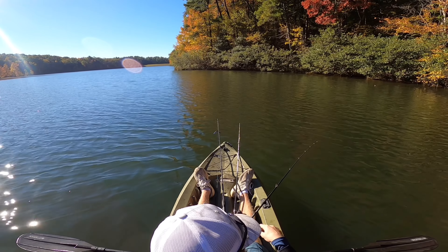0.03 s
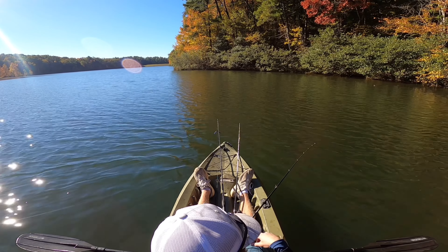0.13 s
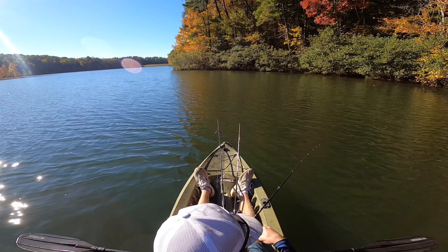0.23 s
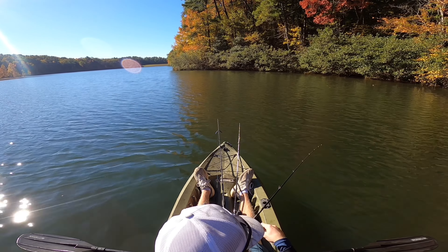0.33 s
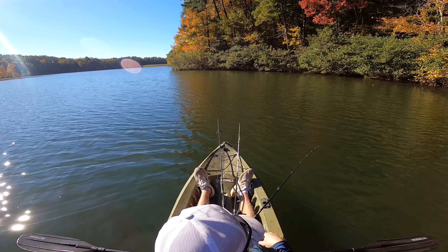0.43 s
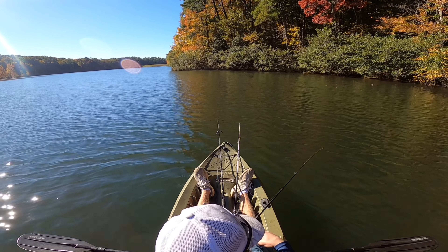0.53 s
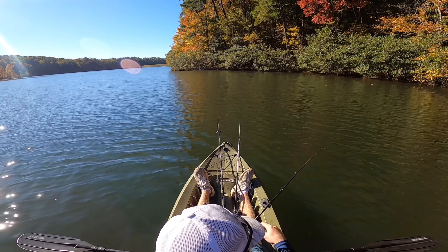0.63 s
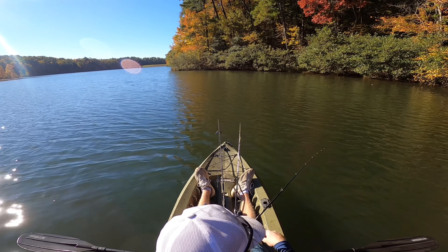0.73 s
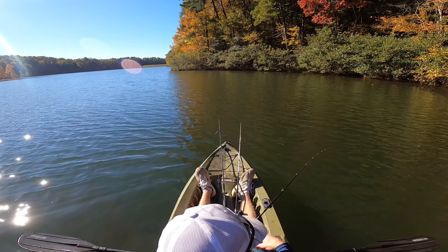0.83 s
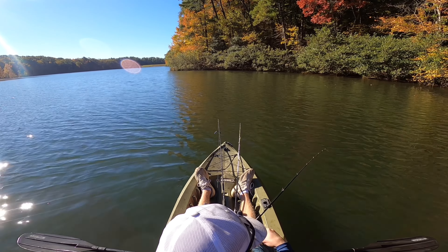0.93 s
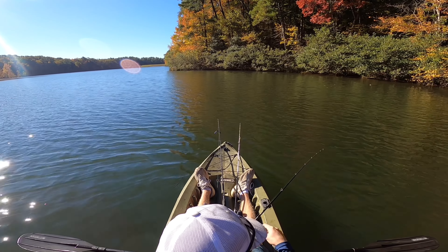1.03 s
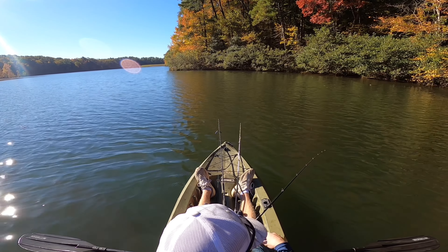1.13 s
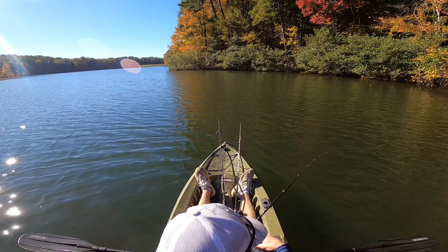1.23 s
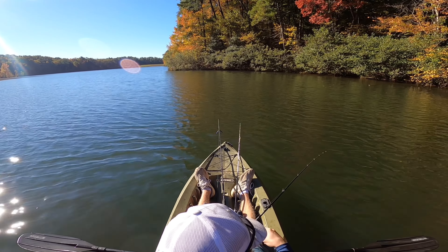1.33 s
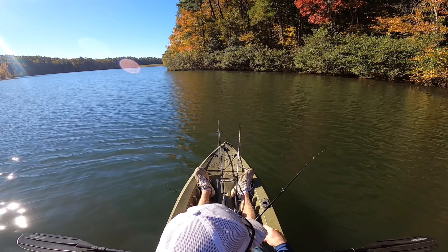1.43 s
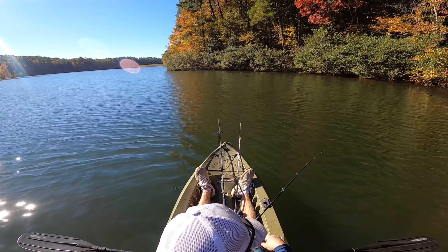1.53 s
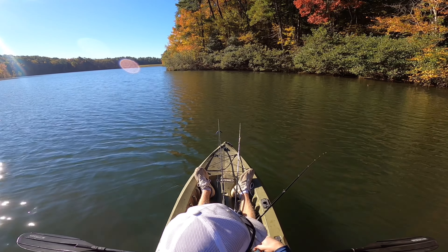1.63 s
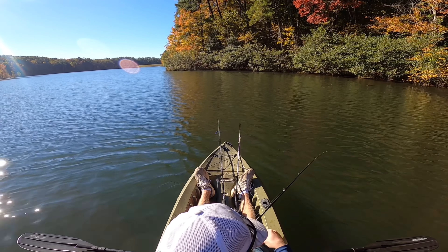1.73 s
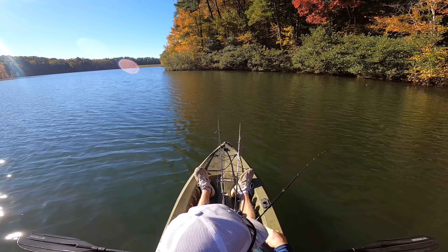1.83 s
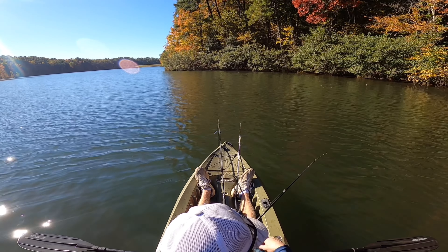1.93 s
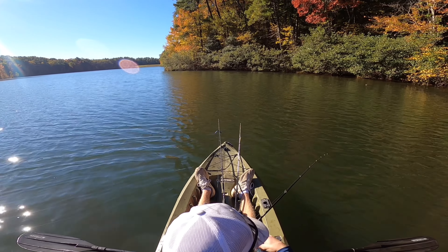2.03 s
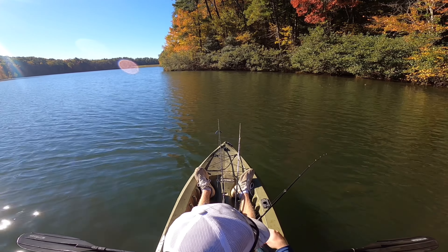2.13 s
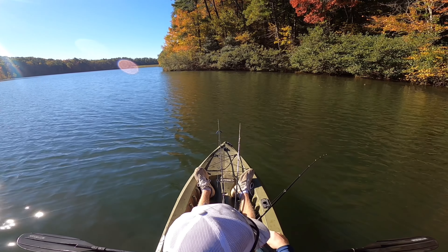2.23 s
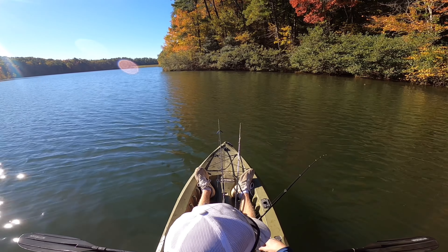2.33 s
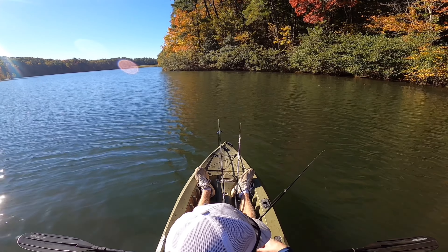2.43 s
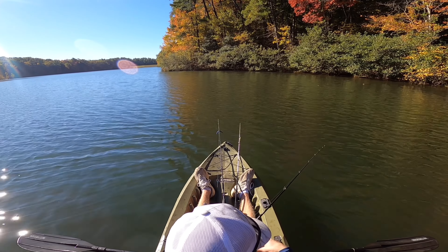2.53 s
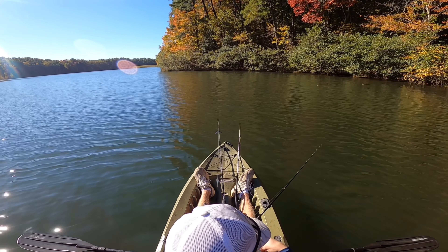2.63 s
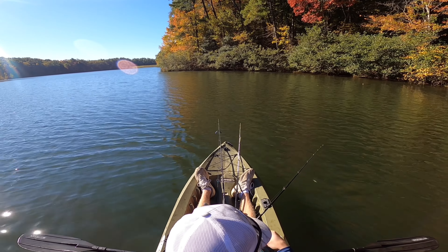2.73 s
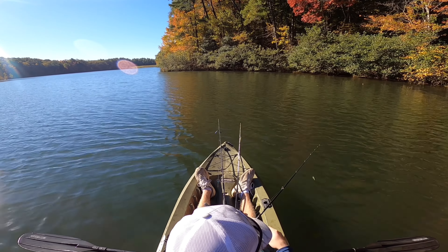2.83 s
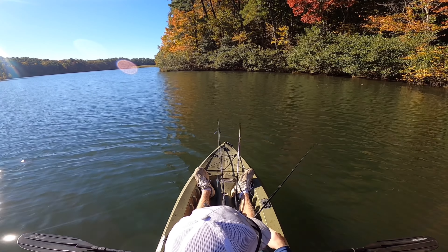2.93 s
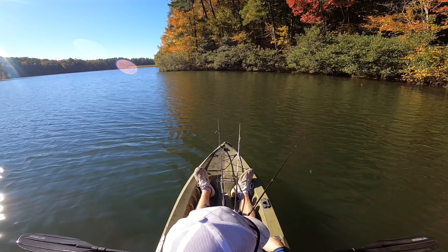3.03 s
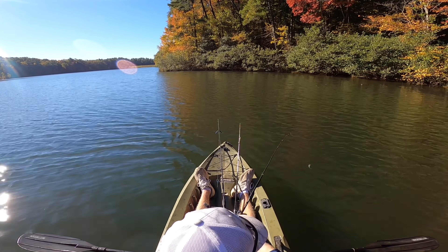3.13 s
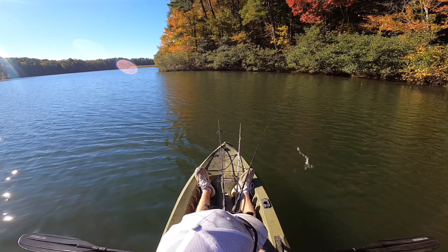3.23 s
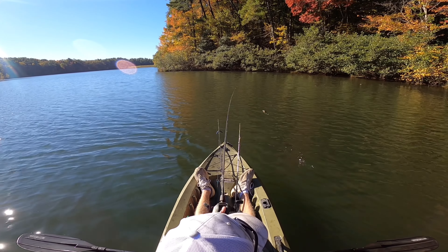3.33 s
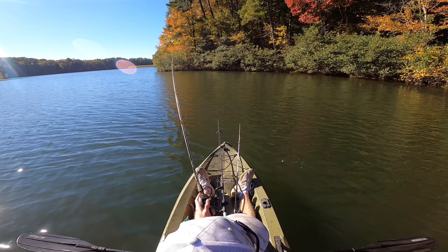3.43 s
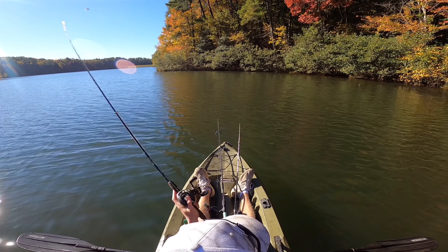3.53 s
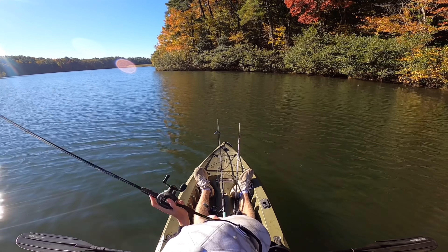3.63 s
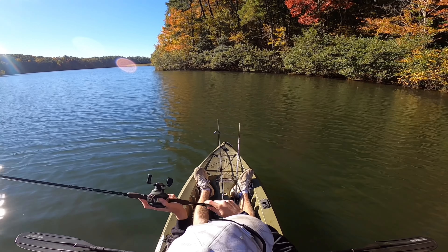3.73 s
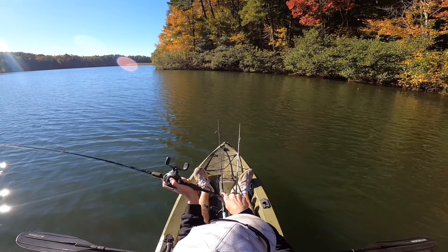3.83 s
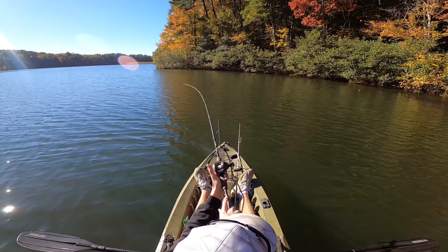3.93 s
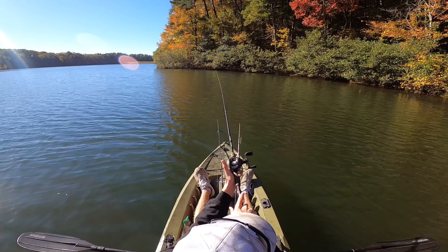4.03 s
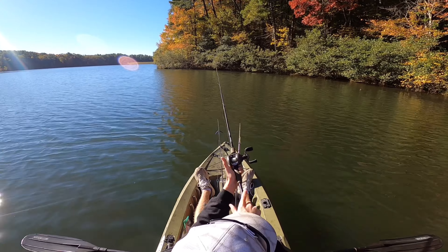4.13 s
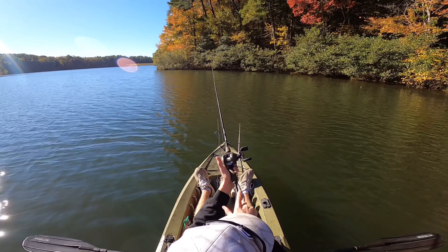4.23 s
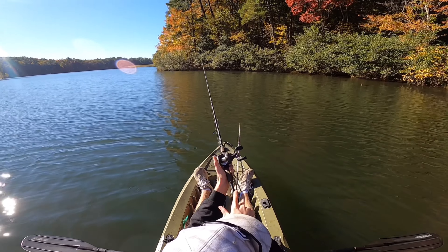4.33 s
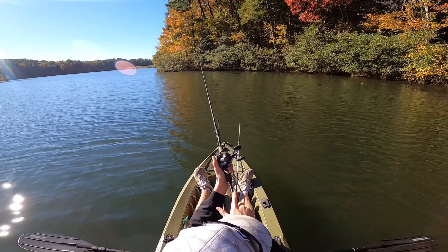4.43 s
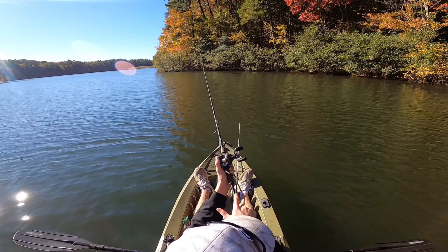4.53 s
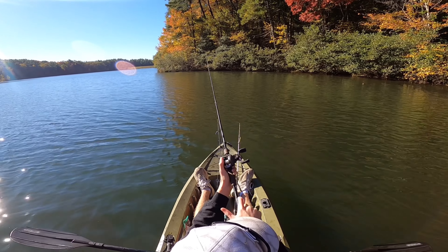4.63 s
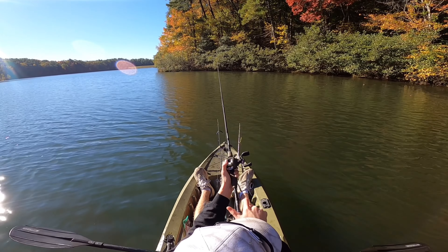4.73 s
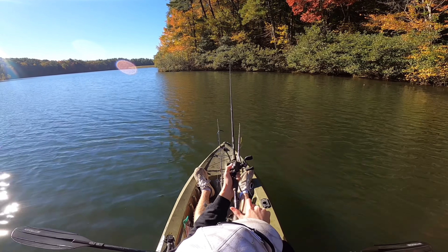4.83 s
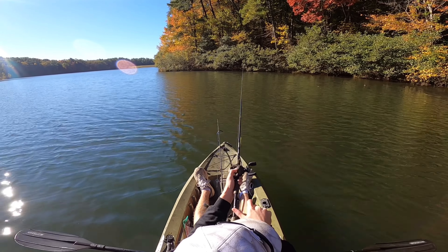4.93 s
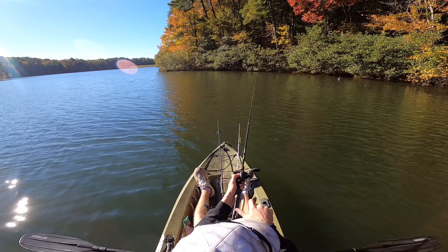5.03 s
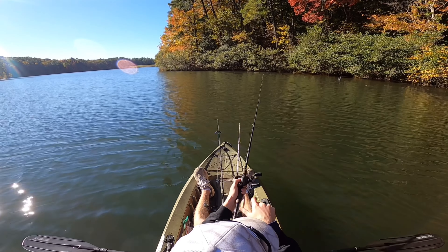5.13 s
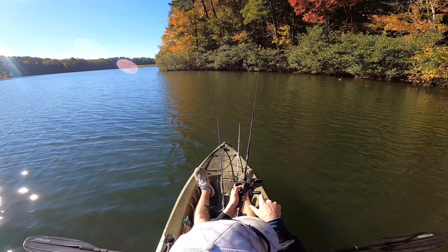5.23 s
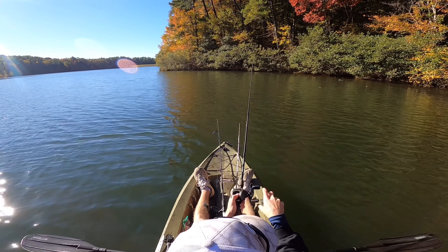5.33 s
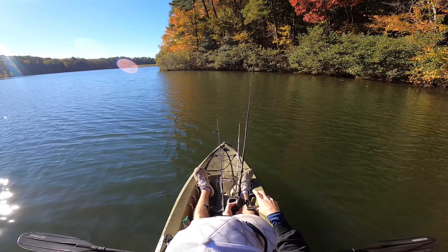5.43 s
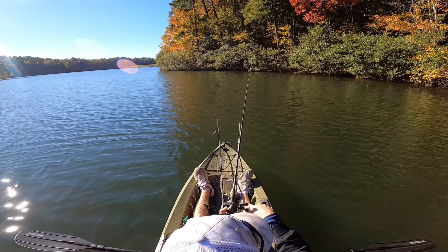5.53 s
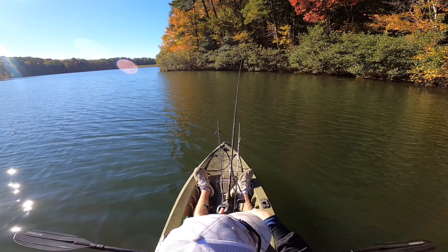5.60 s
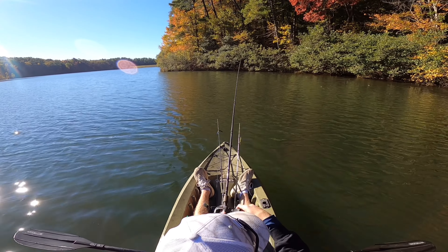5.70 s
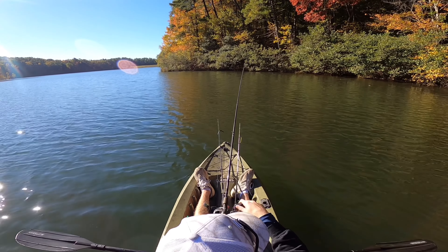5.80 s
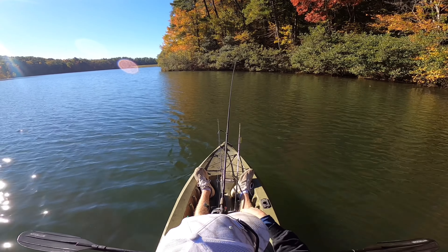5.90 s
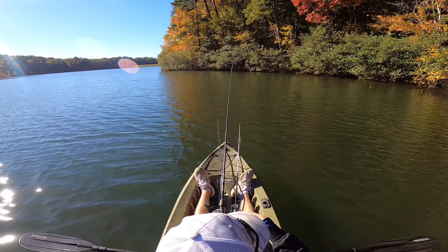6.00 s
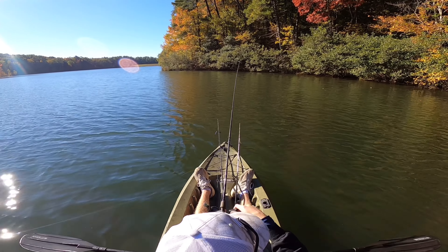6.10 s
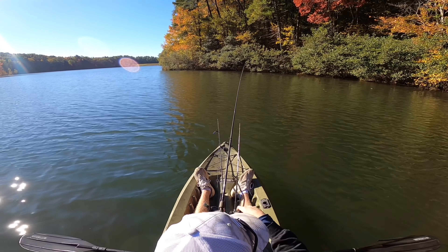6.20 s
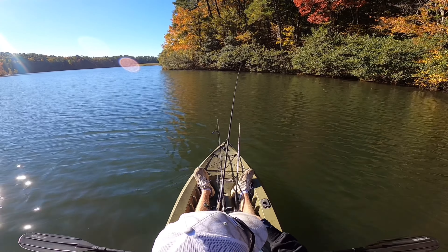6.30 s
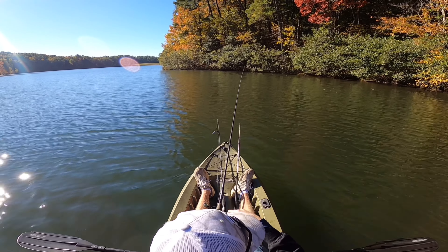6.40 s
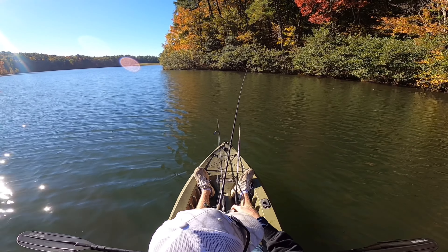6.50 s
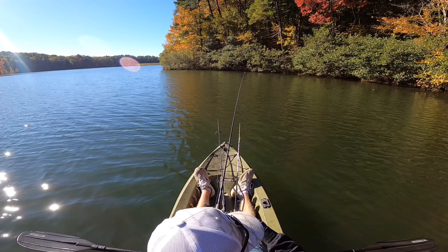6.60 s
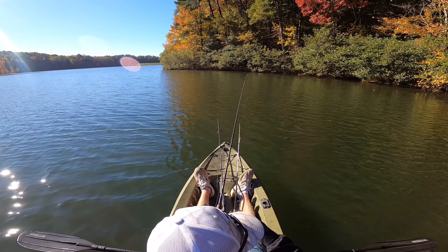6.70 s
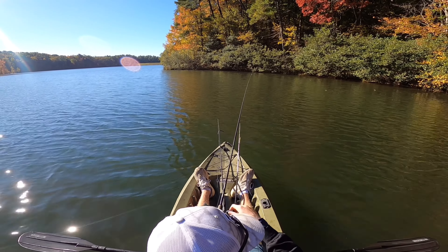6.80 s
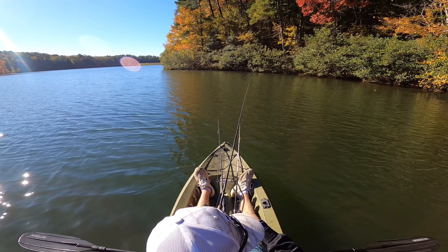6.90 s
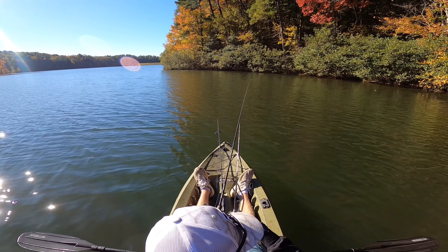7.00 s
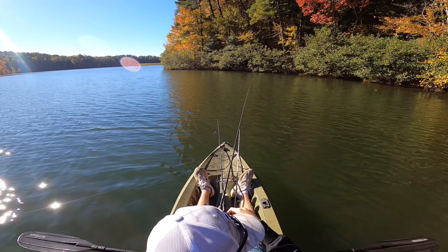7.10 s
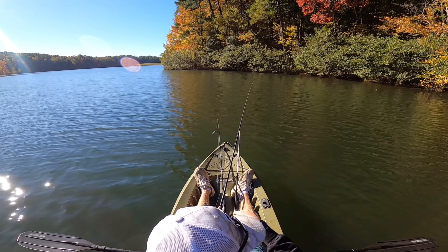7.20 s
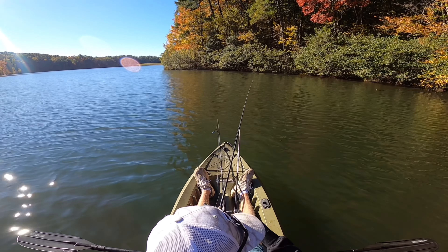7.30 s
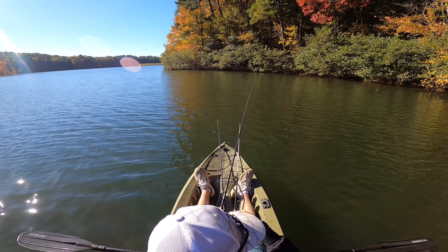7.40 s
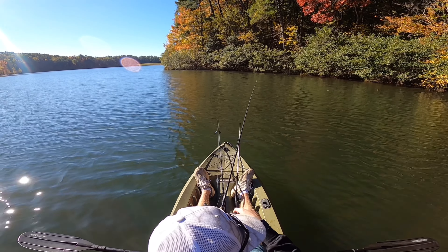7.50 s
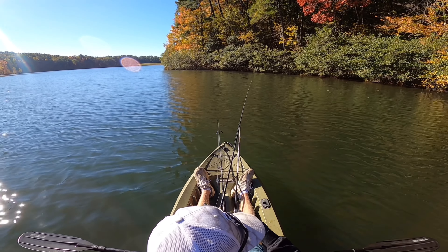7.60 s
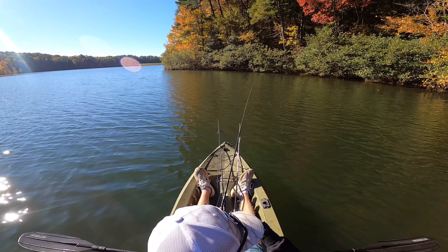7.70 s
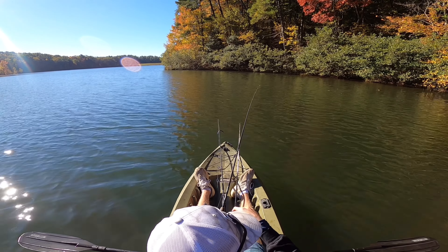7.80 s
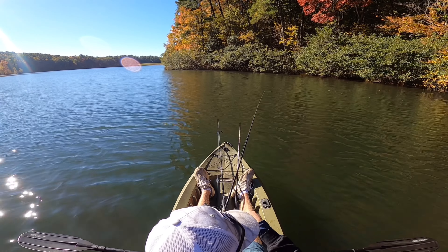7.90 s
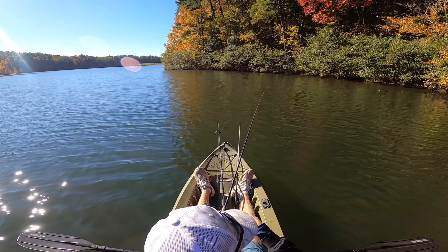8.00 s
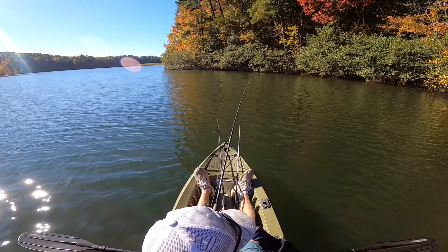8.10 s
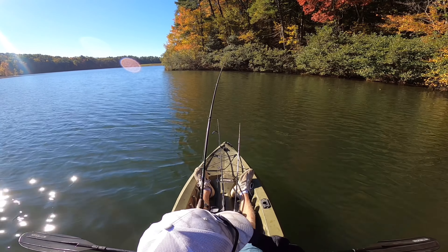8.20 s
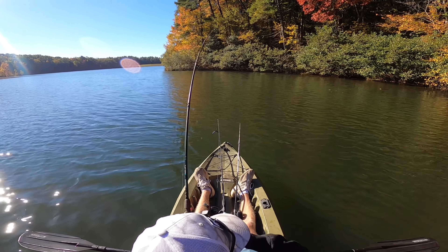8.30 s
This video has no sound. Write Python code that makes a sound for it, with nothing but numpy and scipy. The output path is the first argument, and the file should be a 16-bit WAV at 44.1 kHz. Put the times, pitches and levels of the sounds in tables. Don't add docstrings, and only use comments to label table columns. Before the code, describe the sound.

Close fishing reel gears buzz, a hard clack, then a swish and rattling whirr of a spinning spool, another clack, more winding on a quiet lake.

```python
import sys
import numpy as np
from scipy import signal
from scipy.fft import rfft, irfft, next_fast_len
from scipy.io import wavfile

SR = 44100
rng = np.random.default_rng(int(sys.argv[2]) if len(sys.argv) > 2 else 0)


def bounce(signal):
    frames = np.transpose(np.atleast_2d(signal))
    limited = np.clip(frames, -1, 1)
    pcm = np.round(limited * 32767).astype(np.int16)
    wavfile.write(sys.argv[1], SR, pcm)


def undo_db(level):
    steps = np.asarray(level, float) / 20
    return 10 ** steps


N = 368235
HIT = 4000
HIT_S = np.arange(HIT) / SR


def time():
    return np.arange(N) / SR


def rms_one(x):
    return x / np.sqrt(np.mean(x ** 2) + 1e-20)


def span(rows, start=0.):
    s, *columns = np.transpose(rows)
    part = slice(round((s[0] + start) * SR), min(round((s[-1] + start) * SR), N))
    t = np.arange(part.start, part.stop) / SR - start
    return part, [np.interp(t, s, column) for column in columns]


def at_hz(points, hz):
    point_hz, point_db = np.transpose(points)
    return np.interp(np.log(hz), np.log(point_hz), point_db)


def drift(rate, count):
    r = np.exp(-80 * np.pi * rate / SR)
    slow = signal.lfilter([1], [1, -2 * r, r * r], rng.standard_normal(count // 40 + 1002))[1000:]
    return np.interp(np.arange(count) / 40, np.arange(len(slow)), rms_one(slow))


def resonate(x, hz, width):
    r = np.exp(-np.pi * width / SR)
    return signal.lfilter([(1 - r * r) / 2, 0, (r * r - 1) / 2], [1, -2 * r * np.cos(2 * np.pi * hz / SR), r * r], x)


def body(x, modes):
    return sum((-1) ** k * undo_db(db) * resonate(x, hz, width) for k, (hz, width, db) in enumerate(modes))


def butter(x, order, hz, kind):
    return signal.sosfilt(signal.butter(order, hz, kind, fs=SR, output="sos"), x)


def pair(count, alike):
    mid, side = rng.standard_normal((2, count))
    share = np.clip(alike, 0, 1)
    return np.sqrt((1 + share) / 2) * mid + np.sqrt((1 - share) / 2) * side * [[1], [-1]]


def coloured(spectrum, alike, patchy_db, rate):
    low, high = spectrum[0][0], spectrum[-1][0]
    edges = low * 2 ** np.arange(0, np.log2(high / low) + 1 / 3, 1 / 3)
    white, out = [pair(N, alike), pair(N, alike)], 0
    for k, (a, b) in enumerate(zip(edges, edges[1:])):
        band = butter(white[k % 2], 2, [a, b], "band")
        out = out + undo_db(at_hz(spectrum, np.sqrt(a * b)) + patchy_db * drift(rate, N)) * band
    return rms_one(out)


def glide(rows, start, rough):
    part, (hz, db) = span(rows, start)
    return part, undo_db(db + rough * drift(150, len(hz))) * np.sin(2 * np.pi * np.cumsum(hz) / SR)


def add_hit(out, s, db, sound):
    out[:, round(s * SR):][:, :HIT] += undo_db(db) * sound / np.abs(sound).max()


def lake():
    # (time [s], level [dB])
    gusts = [(0.0, -66.5), (0.65, -64), (0.74, -67), (3.86, -66.5), (4.11, -64), (4.47, -71.5),
             (6.4, -73.5), (6.58, -64), (7.58, -70.5), (7.91, -63), (8.02, -60), (8.35, -55.5)]
    # (frequency [Hz], level [dB per Hz])
    rumble = [(15, -13.5), (25, -21), (70, 1.5), (108, -2.5), (130, 4), (170, -27), (290, -120)]
    drone = [(59, -39.5), (100, -27.5), (152, 2), (204, -2.5), (379, -13), (431, -13.5), (500, -18),
             (800, -36.5), (1040, -71.5), (1760, -120)]
    hush = [(290, -55.5), (500, -14.5), (629, -11), (941, -11.5), (1240, -2), (1560, -22), (1750, -2),
            (1990, -9), (3530, -14.5), (4840, -15), (6550, -21), (12500, -45.5), (15500, -46)]
    drone_level_db, drone_follows, hush_db = -55, 0.13, -59
    sway_s, sway_width_s, sway_top_db = 4.02, 0.15, 7.5
    duck_s, duck_top_db, recover_s = 4.92, 3, 1.13
    t = time()
    rumble_db = np.interp(t, *np.transpose(gusts)) + 6.84
    duck_db = duck_top_db * np.where(t < duck_s, np.exp((t - duck_s) / 0.12), np.exp((duck_s - t) / recover_s))
    sway_db = sway_top_db * np.exp(-.5 * ((t - sway_s) / sway_width_s) ** 2)
    drone_db = drone_level_db + drone_follows * (rumble_db + 53) + sway_db - duck_db
    lumps = drift(10.0, N)
    low = undo_db(rumble_db + 3 * lumps) * coloured(rumble, .85, patchy_db=2.0, rate=4)
    low += undo_db(drone_db + lumps) * coloured(drone, 0.57, patchy_db=2.0, rate=7.5)
    return low + undo_db(hush_db) * coloured(hush, .65, patchy_db=.7, rate=8)


def electronics():
    # (frequency [Hz], width [Hz], level [dB])
    whines = [(10500, 120, -89.5), (12300, 120, -92.5), (14150, 120, -92.5), (8500, 200, -93)]
    out = 0
    for hz, width, db in whines:
        out = out + undo_db(db) * rms_one(resonate(resonate(pair(N, 0.22), hz, width), hz, width))
    return out


def winding():
    # (time [s], effort [dB])
    crank = [
        [(-.12, -27), (.197, -39), (.513, -35.5), (.846, -40), (1.211, -43), (1.589, -40), (1.98, -40.5),
         (2.3, -41.5), (2.62, -48)],
        [(5.3, -45), (5.63, -44), (6.03, -48), (6.307, -46.5), (6.639, -43.5), (6.952, -39.5), (7.31, -42),
         (7.62, -38), (8.06, -55.5), (8.4, -64)],
    ]
    # (start [s], end [s])
    spells = [(0, 2.43), (5.58, 7.9)]
    # (frequency [Hz], width [Hz], level [dB])
    gear_modes = [(1183, 280, 5), (1490, 234, 8.5), (2000, 520, 2), (2500, 67, 9), (3250, 600, -4.5)]
    tooth_hz, throb_s = 185.6, 0.011
    slack_db = 11.5
    whirr_db, whirr_follows = -58.5, 0.12
    t, swell, effort = time(), np.zeros(N), np.zeros(N)
    for rows, (start, end) in zip(crank, spells):
        s, db = np.transpose(rows)
        turn = np.arange(0, len(s) - 1, 1 / 6)
        at = np.interp(turn, np.arange(len(s)), s) + .004 * rng.standard_normal(len(turn))
        level = np.interp(at, s, db) - slack_db * np.sin(np.pi * turn) ** 2
        busy = (start < at) & (at < end)
        swell[(at[busy] * SR).astype(int)] = undo_db(level[busy] - 11.0)
        edge = np.clip(np.minimum(t - start + .05, end - t) / .1, 0, 1)
        effort += edge * undo_db(whirr_db + whirr_follows * (np.interp(t, s, db) + 38.5))
    throb = np.exp(-.5 * ((HIT_S - .04) / (1.08 * throb_s)) ** 2)
    swell = signal.fftconvolve(swell, throb)[round((.04 - throb_s) * SR):][:N]
    teeth = np.cumsum(tooth_hz * (1 + .04 * drift(6, N))) / SR
    mesh = pair(N, 0.85) * (0.053 + np.exp(-4.0 * (teeth % 1)))
    gears = swell * rms_one(body(mesh, gear_modes))
    wet_line = pair(N, 0.73) * undo_db(2.0 * drift(24, N))
    whirr = body(wet_line, [(1300, 640, 0.5), (2300, 520, 5.5), (3190, 1000, -1.5)])
    return gears + effort * rms_one(whirr)


def bank(x, echo_db):
    t60_s = .6
    t = np.arange(SR) / SR
    wash = pair(SR, 0.66) * undo_db(-60 * t / t60_s) * (t > .004)
    return undo_db(echo_db) * signal.fftconvolve(x[None], wash / np.sqrt(np.sum(wash[0] ** 2)), axes=1)[:, :N]


def wildlife():
    # (time [s], level [dB])
    chips = [(0.771, -43), (2.243, -47.5), (3.728, -43.5), (5.369, -47), (6.889, -46)]
    caws = [(1.335, -60), (1.945, -56), (2.265, -54), (2.575, -57), (2.885, -56)]
    # (time [s], frequency [Hz], level [dB])
    chip_shape = [(0, 7200, -9), (.006, 7900, -9), (.011, 8000, -6), (.014, 6800, -3), (.017, 6500, -16)]
    caw_shape = [(0, 1200, -4), (.02, 1450, 0), (.045, 1660, -1), (.07, 1620, -2), (.1, 1420, -1),
                 (.15, 1220, -5)]
    # (delay [s], from [Hz], to [Hz], length [s], level [dB])
    splits = [(.011, 5900, 4500, .006, 2), (.015, 3400, 2300, .006, -2), (.02, 2600, 1500, .005, -9)]
    cricket_hz, cricket_db = 5100, -64.5
    chirp_s, chirp_first_s, chirp_every_s = .045, .075, .3362
    far, near = np.zeros((2, N))
    for calls, shape, rough in ((chips, chip_shape, 5.0), (caws, caw_shape, 1)):
        for s, db in calls:
            part, call = glide(shape, s, rough)
            far[part] += undo_db(db) * call
    for s, db in chips:
        for delay, high, low, length, split_db in splits:
            fall = [(0, high, -3), (length / 2, (high + low) / 2, 0), (length, low, -4)]
            part, call = glide(fall, s + delay, 3.0)
            far[part] += undo_db(db + split_db + 1.0) * call
    arch = [(0, .97 * cricket_hz, -15), (.01, cricket_hz, 0),
            (chirp_s, cricket_hz, 0), (chirp_s + .01, .98 * cricket_hz, -15)]
    for s in np.arange(chirp_first_s, N / SR - .05, chirp_every_s):
        db = cricket_db + .8 * rng.standard_normal()
        part, call = glide(arch, s - .03, 1.8)
        near[part] += undo_db(db) * call
    for gain, delay_s in ((.5, .0027), (.45, .0058), (.35, .0113), (.3, .0191)):
        skips = gain * np.roll(far, round(delay_s * SR))
        far_sum = skips if delay_s == .0027 else far_sum + skips
    far = far + far_sum
    return .75 * far + bank(far, echo_db=-4) + near + bank(near, echo_db=-12)


def pings():
    # (time [s], peak [dB], frequency [Hz], t60 [s])
    ringing = [(2.764, -31, 1760, 0.065), (3.213, -44, 2300, 0.06), (3.229, -41, 1390, .03),
               (3.27, -47, 932, 0.16), (3.2805, -36, 1735, 0.034), (3.283, -27.5, 1750, 0.018),
               (3.412, -59, 4780, 0.19), (5.239, -40.5, 1240, 0.018), (5.3445, -41.5, 1990, 0.031),
               (5.8379, -39.5, 1300, 0.014)]
    out = np.zeros((2, N + HIT))
    for s, db, hz, t60 in ringing:
        envelope = undo_db(-60 * HIT_S / t60) * np.minimum(HIT_S / 0.00039, 1)
        add_hit(out, s, db, np.sin(2 * np.pi * hz * HIT_S) * envelope * undo_db(2 * drift(100, HIT)))
    return out


def sleeve():
    # (time [s], peak [dB], centre [Hz], hold [s], t60 [s])
    drags = [(3.195, -31, 2200, 0.0032, 0.05), (3.202, -50, 2150, 0.038, 0.12),
             (3.262, -54, 1690, 0.035, 0.29), (3.583, -58.5, 2700, 0.095, 0.71),
             (5.243, -55, 1340, 0.022, 0.23), (5.297, -56, 1300, 0.012, 0.17),
             (5.393, -52.5, 1160, 0.028, 0.1), (5.501, -29.5, 2500, 0.0021, 0.1),
             (5.528, -58, 2300, 0.0057, 0.17), (8.045, -53.5, 1890, 0.053, 0.26),
             (8.234, -57.5, 1100, 0.052, 0.15), (3.007, -56, 1200, 0.026, 0.19)]
    rise_s = .004
    out = np.zeros((2, N))
    for s, peak_db, hz, hold, t60 in drags:
        part, (db,) = span([(s - rise_s, peak_db - 14), (s, peak_db),
                            (s + hold, peak_db - 1), (s + hold + t60 / 4, peak_db - 16)])
        grain = pair(len(db), 0.6) * undo_db(1.4 * drift(110, len(db)))
        out[:, part] += undo_db(db) * rms_one(resonate(resonate(resonate(grain, hz, hz), hz, hz), hz, 2 * hz))
    return out


def knocks():
    # (time [s], peak [dB], frequency [Hz], t60 [s])
    hull = [
        (3.036, -38.5, 350, 0.033),
        (3.198, -35.5, 444, 0.011),
        (3.937, -22.5, 396, 0.042),
        (3.976, -34, 347, 0.11),
        (5.505, -36, 508, 0.027),
    ]
    out = np.zeros((2, N + HIT))
    for s, db, hz, t60 in hull:
        thud = undo_db(2 * drift(120, HIT)) * np.sin(2 * np.pi * hz * HIT_S)
        thud = thud + .25 * np.sin(2 * np.pi * 1.8 * hz * HIT_S)
        add_hit(out, s, db, undo_db(-60 * HIT_S / t60) * thud * np.minimum(HIT_S / 0.0029, 1))
    return out


def ticks():
    # (time [s], peak [dB],
    # centre [Hz], t60 [s], bright crack [dB])
    small = [(3.2285, -39.5, 9100, 0.011, 1), (3.239, -37.5, 1710, 0.024, 6), (3.2885, -31, 2900, 0.021, 4),
             (3.276, -44, 5500, .012, 0), (3.2845, -38, 10000, 0.023, -10), (3.3045, -41.5, 6500, 0.03, -2),
             (3.312, -41, 1400, .03, -7), (3.3792, -44, 3070, 0.012, -13), (3.411, -35.5, 2860, 0.015, -17),
             (3.411, -48, 5000, .012, -17), (3.5778, -37.5, 3240, 0.022, 8), (3.5994, -40, 5500, 0.014, 2),
             (3.8417, -49, 5000, 0.012, -7), (3.9777, -15, 6200, 0.0094, 4),
             (5.0622, -35, 2110, 0.012, -24), (5.083, -29, 2650, 0.054, -1), (5.2379, -31, 2240, 0.007, 2),
             (5.2504, -44, 1520, 0.012, -16), (5.46, -39, 1590, 0.013, 1), (5.467, -35, 2430, 0.012, 5),
             (5.987, -38, 2230, 0.012, -1), (7.2694, -43.5, 2600, 0.021, -22),
             (7.6285, -39, 2100, 0.0092, -12), (7.784, -46, 2208, 0.0123, 0),
             (8.034, -37.5, 2400, 0.0073, -3), (8.053, -42, 1240, .02, -12), (8.232, -48.5, 1380, .03, -20),
             (8.263, -47.5, 1000, .04, -25), (3.741, -43, 4940, .02, -12), (5.383, -45, 5170, .012, -20),
             (5.339, -45.5, 5500, .01, -12), (5.258, -45, 1600, .02, -20), (5.271, -46, 2000, .02, -20),
             (5.43, -50.5, 1400, .03, -25), (3.936, -22, 1800, .006, -15)]
    latch = [(3.187, -39, 3680, 0.011, -16), (3.1925, -30, 3000, 0.026, -8.5),
             (5.4835, -29, 2420, 0.021, -4.5), (5.494, -29.5, 2300, 0.013, -8),
             (5.497, -34, 3400, .012, -5.5), (5.5025, -24.5, 3000, .012, 6.5),
             (5.5102, -23, 2200, 0.022, -1), (5.5135, -29, 2380, 0.013, -5),
             (3.2045, -26, 2400, 0.012, -10), (3.22, -54, 5000, .01, 0)]
    # (frequency [Hz], width [Hz], level [dB])
    crack = [(3780, 3100, -13.5), (5000, 780, 2.5), (6800, 2300, -2.5), (9280, 6500, -12.5),
             (13200, 2660, -25.5)]
    out = np.zeros((2, N + HIT))
    for s, db, hz, t60, bright_db in small + latch:
        noise = pair(HIT, 1.0) * undo_db(-60 * HIT_S / t60)
        add_hit(out, s, db, resonate(noise, hz, 0.23 * hz) + undo_db(bright_db - 10.5) * body(noise, crack))
    return out


def clacks():
    # (time [s], peak [dB], travel [s], modes as (frequency [Hz], width [Hz], level [dB]))
    snaps = [
        (3.1973, -3.5, 0.0015, [(1100, 270, 3.5), (1600, 860, -1), (2300, 460, 8.5), (3030, 560, -4), (3800, 940, 10), (5000, 2800, 3.5), (7310, 930, 3), (9260, 940, -6), (12600, 900, -27)]),
        (3.9388, -9, 0.0015, [(1475, 710, -12), (3700, 3500, -6), (5000, 1500, 1.5), (6800, 900, 6), (12350, 1500, -12)]),
        (3.9412, -5, 0.0028, [(1475, 710, -14), (3620, 3200, -8), (5000, 2200, -2), (6800, 800, 5), (11820, 1200, -5)]),
        (3.945, -10, 0.002, [(2000, 1500, -8), (4460, 2000, -7), (6800, 730, -0.5)]),
        (5.5053, 1, 0.0024, [(1230, 600, -7), (1600, 340, 0.5), (2334, 780, 5.5), (3250, 2400, -2.5), (4000, 800, -13), (5000, 520, -1), (5600, 300, 1.5), (6690, 420, -2), (7416, 2070, -3), (8930, 2200, -18.5), (11420, 1800, -16.5), (13500, 1800, -20), (14900, 1600, -28)]),
    ]
    out = np.zeros((2, N + HIT))
    for s, db, travel, modes in snaps:
        slide = np.sqrt(np.abs(np.sin(np.pi * np.minimum(HIT_S / travel, 1)))) * (HIT_S < travel)
        contact = slide + undo_db(-22 - 60 * HIT_S / .022)
        grit = pair(HIT, 0.92)
        clack = 0
        for hz, width, mode_db in modes:
            tone = np.sin(2 * np.pi * (hz * HIT_S + rng.random()))
            push = contact * (tone + width / 900 * grit)
            ring = rms_one(resonate(resonate(push, hz, 3 * width), hz, width))
            clack = clack + undo_db(mode_db) * np.sqrt(width) * ring
        add_hit(out, s, db, clack)
    return out


def line_in_air():
    # (time [s], frequency [Hz], level [dB])
    passes = [
        [(3.46, 5000, -73), (3.52, 5940, -59), (3.57, 7360, -51), (3.64, 7500, -53.5), (3.72, 6130, -54.5),
         (3.82, 4560, -62)],
        [(3.82, 4650, -61), (3.86, 5290, -48.5), (3.9, 6600, -39), (3.93, 8550, -65.5), (3.96, 8050, -40)],
    ]
    out = np.zeros((2, N))
    for rows in passes:
        part, (hz, db) = span(rows)
        eddies = butter(pair(len(hz), 0.92), 4, 1700, "low")
        out[:, part] += undo_db(db) * rms_one(eddies * np.sin(2 * np.pi * np.cumsum(hz) / SR))
    return out


def rod_swish():
    # (time [s], level [dB])
    sweep = [(3.84, -54), (3.862, -62), (3.912, -31.5), (3.942, -28.5), (3.958, -36.5), (3.99, -25)]
    out = np.zeros((2, N))
    part, (db,) = span(sweep)
    out[:, part] += undo_db(db) * rms_one(butter(pair(len(db), 0.96), 1, [700, 3500], "band"))
    return out


def spool():
    # (time [s], level [dB])
    rattle_curve = [(3.95, -38), (3.965, -40.5), (4.008, -24.5), (4.09, -24.5), (4.69, -32.5),
                    (4.85, -36.5), (5.05, -44.5), (5.085, -45), (5.1, -55), (5.13, -57)]
    # (time [s], turn rate [Hz])
    spin_up = [(3.95, 215.4), (3.99, 250.4), (4.026, 281), (4.058, 289.8), (4.098, 318.2)]
    # (frequency [Hz], width [Hz], level [dB])
    frame = [(1100, 270, -7), (1638, 160, -3.5), (2070, 265, -3.5), (2484, 270, 2.5), (3480, 440, 2.5)]
    rim = [(3850, 230, -11.5), (4335, 210, -0.5), (4650, 318, -1), (5800, 1220, -5.5)]
    plate = [(6350, 260, 8), (6900, 190, 11), (7410, 770, 2.5)]
    sizzle = [(8460, 2200, -4), (11130, 600, -5), (11700, 720, -8), (14140, 1500, -34.5)]
    # (level above the frame at top speed [dB], loss per dB of speed [dB])
    rim_law = (1.0, 0.85)
    plate_law = (2.75, 0.73)
    sizzle_law = (-8, 0.202)
    # (multiple of the turn rate, level [dB])
    hum_orders = [(1, -1.5), (2, -9.5), (3, -9.5), (4, 1.5), (5, 2), (6, 1), (7, 1), (8, -1.5)]
    free_s, fastest_s, top_turns_hz, slowing_per_s = 3.96, 4.098, 318.4, 1.3
    hum_top_db, hum_per_speed, hum_rise_s = -38, 4.1, 0.029
    handle_hz, handle_width_hz, handle_db = 312, 7.3, 6
    out, (part, (frame_db,)) = np.zeros((2, N)), span(rattle_curve)
    t = time()[part]
    count = len(t)
    to_go = np.clip((fastest_s - t) / (fastest_s - free_s), 0, 1)
    rate = np.interp(t, *np.transpose(spin_up)) * np.exp(-slowing_per_s * np.maximum(t - fastest_s, 0))
    speed_db = 20 * np.log10(np.where(to_go > 0, 1, rate / top_turns_hz))
    rim_db, plate_db, sizzle_db = (db + share * speed_db for db, share in (rim_law, plate_law, sizzle_law))
    turns = np.cumsum(rate) / SR
    strength = undo_db(1.7 * rng.standard_normal(400))[turns.astype(int)]
    cycle = (turns + .04 * drift(60, count)) % 1
    burst = .13 + .0016 * rate + strength * 150 * cycle ** 2 * np.exp(-10 * cycle)
    hiss = pair(count, 0.89) * burst
    rattle = rms_one(body(hiss, frame))
    rattle += undo_db(rim_db) * rms_one(body(hiss, rim))
    rattle += undo_db(plate_db) * rms_one(body(hiss, plate))
    rattle += undo_db(sizzle_db) * rms_one(body(pair(count, 0.32) * (burst + 0.11), sizzle))
    rattle = butter(rattle, 3, 880, "high")
    rattle += undo_db(-28.5) * rms_one(resonate(resonate(hiss, 560, 513.5), 560, 513))
    ring_db = handle_db * np.exp(-.5 * ((rate - handle_hz) / handle_width_hz) ** 2)
    hum = 0
    for k, db in hum_orders:
        waver_db = 2.1 * np.sqrt(k) * drift(25, count)
        order_db = db - k - 2.5 * (k - 1) * to_go + ring_db / k ** 2 + waver_db
        phase = 2 * np.pi * k * turns + .2 * k * drift(18, count)
        hum = hum + (rate / 300) ** (.5 - .2 * k) * undo_db(order_db) * np.sin(phase)
    hum_db = hum_top_db + hum_per_speed * speed_db - 2.0 * to_go + 3.0
    rise = np.minimum((t - t[0]) / hum_rise_s, 1) ** 2
    out[:, part] = undo_db(frame_db) * rattle + undo_db(hum_db) * rise * hum
    return out


def scene():
    reel_parts = butter(pings() + ticks() + clacks(), 3, 850, "high")
    clicks = (reel_parts + knocks())[:, :N]
    echo = bank(resonate(clicks[0], 2200, 2500), echo_db=-25.5)
    background = lake() + electronics() + wildlife()
    return background + winding() + clicks + echo + sleeve() + line_in_air() + rod_swish() + spool()


def top_cut(x):
    return signal.sosfilt(signal.butter(12, 16100, fs=SR, output="sos"), x)


def record(dry):
    # (frequency [Hz], level [dB])
    port_balance = [(60, 0), (110, 1.5), (200, 0), (380, -3), (700, -2), (1290, -1.5), (2380, 1.5),
                    (4400, 0.5), (8120, -1), (15000, -12)]
    lag_s = 4.2e-5
    size = next_fast_len(N)
    hz = np.arange(size // 2 + 1) * SR / size + 1
    tilt = undo_db(at_hz(port_balance, hz) / 2)
    left = irfft(rfft(dry[0], size) * tilt * np.exp(-2j * np.pi * hz * lag_s), size)
    right = irfft(rfft(dry[1], size) / tilt, size)
    rounded = np.tanh([left[:N], right[:N]])
    ports = signal.sosfilt(signal.cheby2(6, 50, 17000, fs=SR, output="sos"), rounded)
    return top_cut(ports)


dry = scene()
out = record(dry)
bounce(out)
```